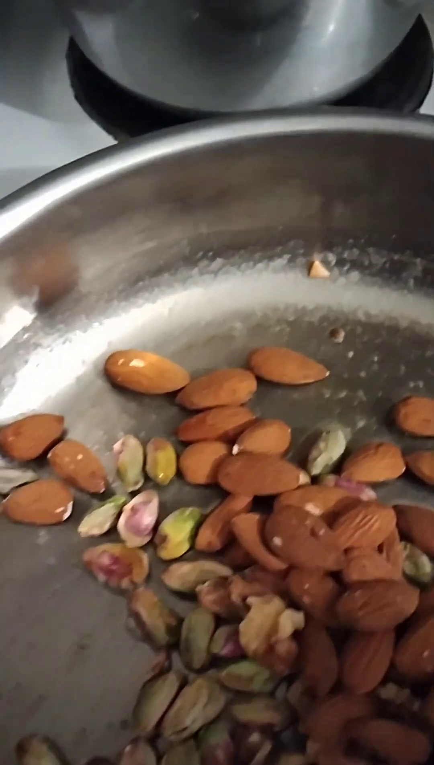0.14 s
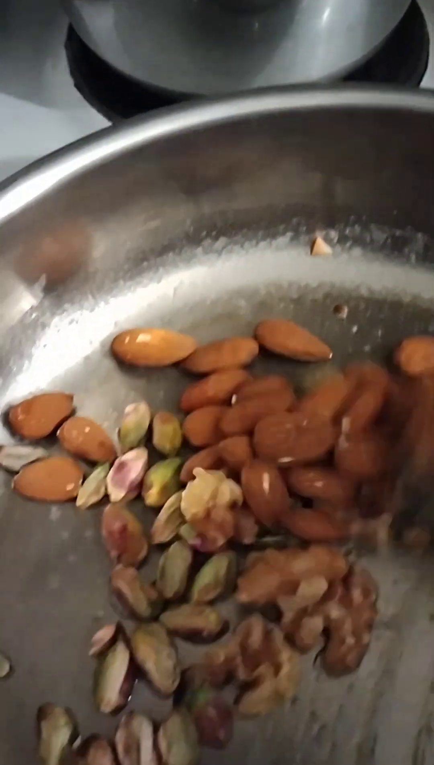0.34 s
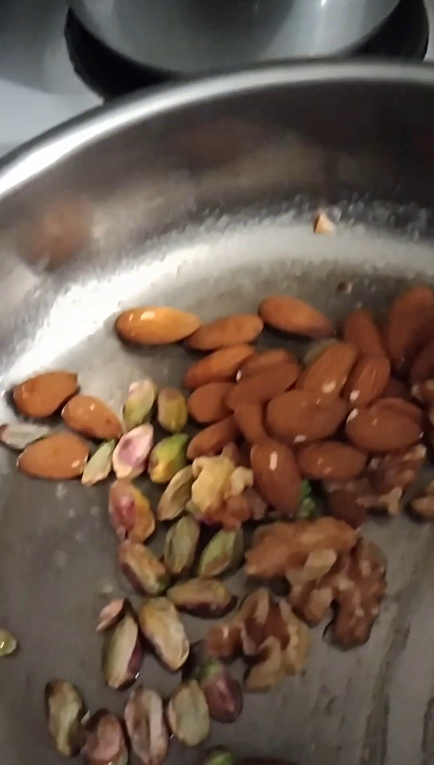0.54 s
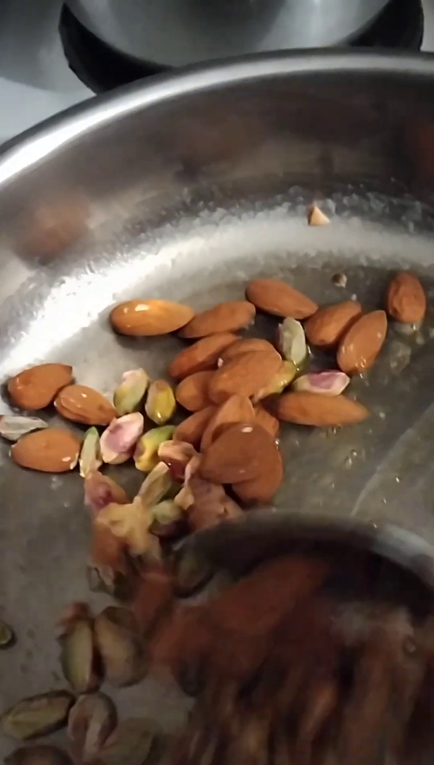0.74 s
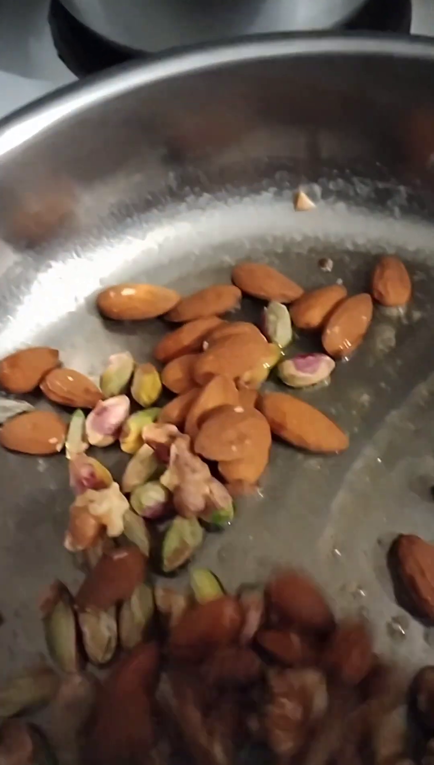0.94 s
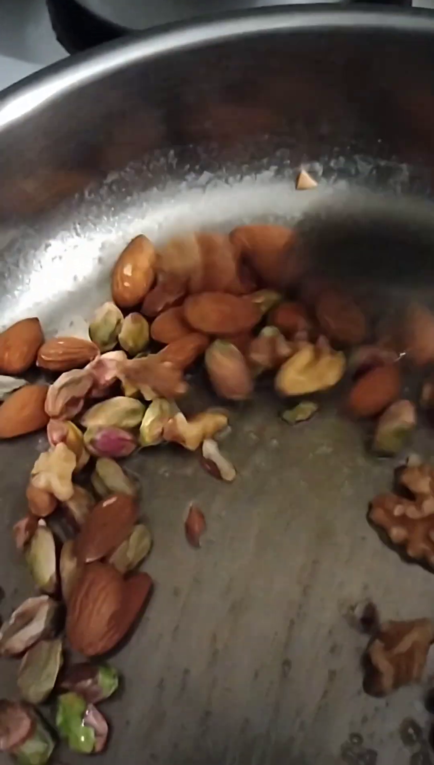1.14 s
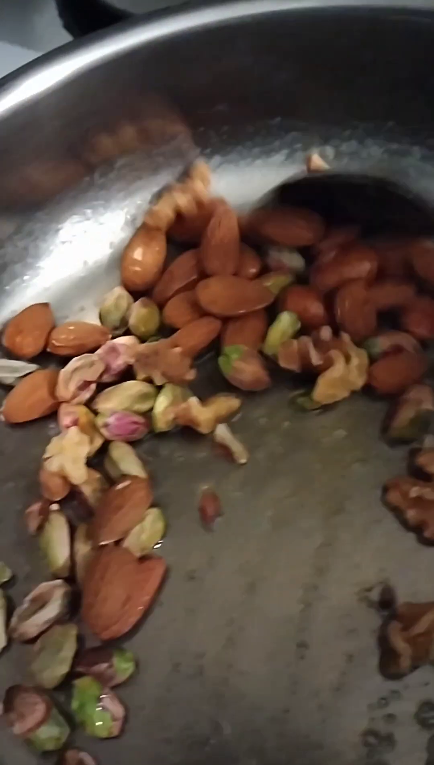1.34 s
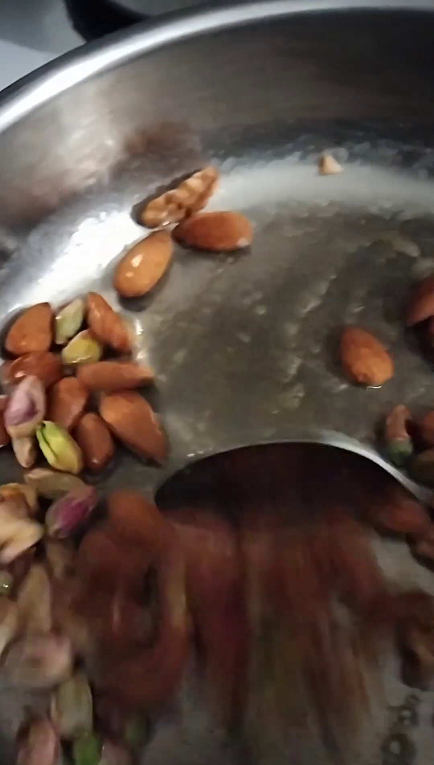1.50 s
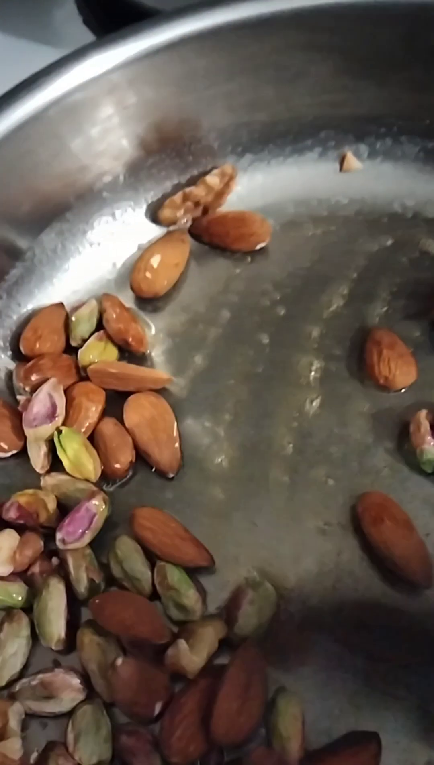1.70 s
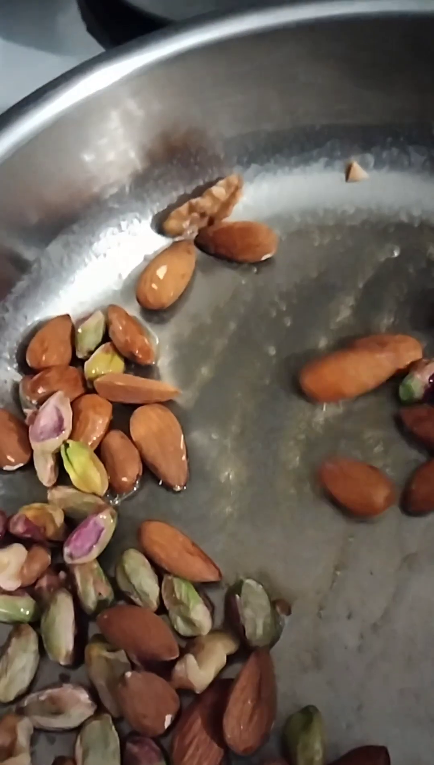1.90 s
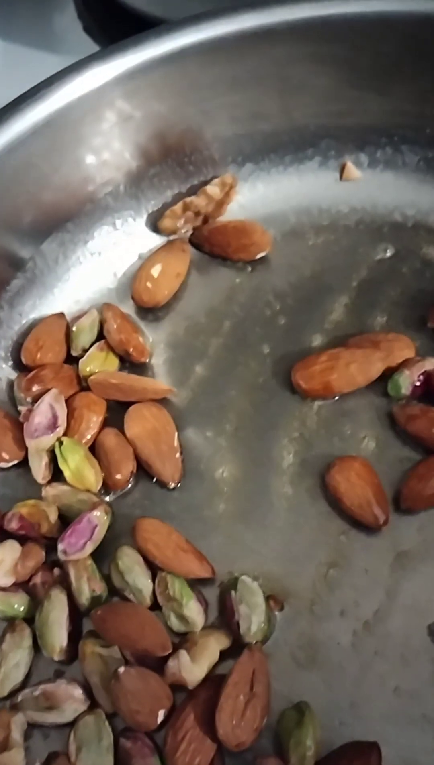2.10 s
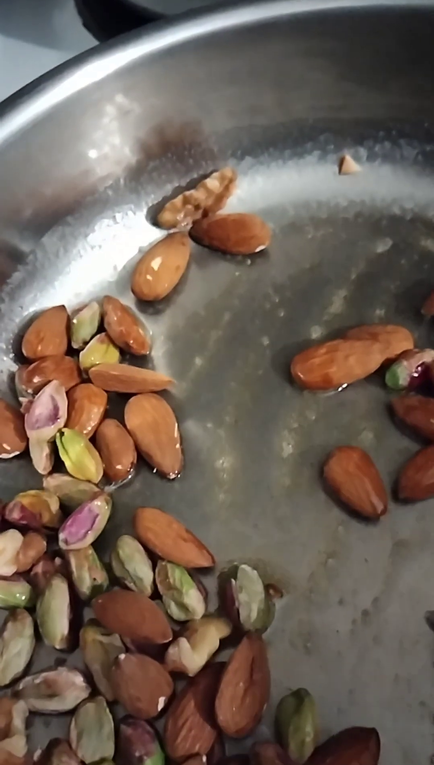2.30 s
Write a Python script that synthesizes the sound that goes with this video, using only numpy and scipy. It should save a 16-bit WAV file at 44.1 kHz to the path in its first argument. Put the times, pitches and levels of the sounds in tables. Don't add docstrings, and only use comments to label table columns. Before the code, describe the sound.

A metal spoon clangs on a steel frying pan, then knocks and scrapes in short strokes while nuts tumble and tap and fat spits; heard very close on a phone in a small kitchen.

```python
import sys
import numpy as np
from scipy import signal
from scipy.fft import rfft, irfft, next_fast_len
from scipy.io import wavfile
from scipy.ndimage import uniform_filter1d, map_coordinates

SR = 44100
rng = np.random.default_rng(int(sys.argv[2]) if len(sys.argv) > 2 else 0)


def pcm_store(signal):
    levels = np.round(np.clip(np.atleast_2d(signal), -1, 1) * 32767)
    wavfile.write(sys.argv[1], SR, levels.astype(np.int16).T)


def ratio_of_db(decibels):
    return 10 ** (np.asarray(decibels, float) / 20)


N = 103635


def unit(x):
    return x / np.sqrt(np.mean(x ** 2) + 1e-20)


def along(points, hz):
    f, v = np.transpose(points)
    return np.interp(np.log(hz + 1), np.log(f + 1), v)


def over_time(rows, outside=None):
    s, value = np.transpose(rows)
    return np.interp(np.arange(N) / SR, s, value, outside, outside)


def wobble(rate):
    knots = rng.standard_normal(int(N * rate / SR) + 4)
    return map_coordinates(knots, [np.arange(N) * rate / SR])


def filtered(x, response):
    m = next_fast_len(N + SR // 2)
    return irfft(rfft(x, m) * response(np.fft.rfftfreq(m, 1 / SR)), m)[..., :N]


def coloured(x, points):
    def response(f):
        inside = (f > points[0][0] / 2) * (f < points[-1][0] * 2)
        return ratio_of_db(along(points, f)) * inside
    return filtered(x, response)


def tilted(points, bright_db):
    return [(hz, g + bright_db * np.log2(hz / 3000)) for hz, g in points]


def resonant(x, peaks):
    def body(f):
        total = 0
        for k, (c, w, db) in enumerate(peaks):
            total = total + (-1) ** k * ratio_of_db(db) * 1j * f * w / (c * c - f * f + 1j * f * w)
        return total
    blow = np.eye(1, N)[0]
    return filtered(x, body) / np.abs(filtered(blow, body)).max()


def bumps(per_s, spread_db):
    u = rng.random((3, N))
    happens = u[0] < per_s / SR
    size = ratio_of_db(-spread_db * np.log(u[2] + .015))
    return unit(happens * np.sign(u[1] - .5) * size)


# start_s, peak_db, chatter_s, spoon_share (0 pan - 1 spoon), bright_db_per_octave
CLANGS = [
    (0.185, -3.5, 0.0028, 0, -2),
    (.204, -5.5, 0.002, 0.2, -2.5),
    (2.04, -2.5, 0.023, 0.69, 1),
]
# pitch_hz, level_db, t60_s
PAN_RING = [(1908, 7, 0.16), (2673, -3, 0.3), (3157, 1.5, 0.24), (5770, -6, 0.29), (6220, 4, 0.1),
            (6600, -9, 0.3)]
# pitch_hz, level_db, t60_s
SPOON_RING = [(1125, -8, .5), (2762, -14, .36), (3451, -16, .3), (4269, -21, .4), (4673, -12, .13),
              (5652, -14, .17), (6772, -8, .14), (9297, -10, .08), (11330, -6, .09), (12370, -9, .09)]
# freq_hz, level_db (per Hz)
CHATTER = [(200, -8.5), (900, -4), (2000, -6), (4500, -9.5), (6400, 4), (8500, -6.5), (13000, -1.5),
           (16000, -11)]
RING_DB, CHATTER_DB, CHATTER_T60_S = -14.5, -10, 0.04


def ringing(modes, s, t, blur):
    out = 0
    for hz, db, t60 in modes:
        phase = 2 * np.pi * hz * (t + s) + blur * wobble(118)[:len(t)]
        out = out + ratio_of_db(db - 60 * t / t60) * np.sin(phase)
    return out


def clangs():
    out, t = np.zeros(N + SR), np.arange(SR // 2) / SR
    for s, db, chatter, spoon_share, bright_db in CLANGS:
        hiss = unit(coloured(bumps(9000, 3.0), tilted(CHATTER, bright_db)))[:len(t)]
        noise = hiss * ratio_of_db(CHATTER_DB - 60 * np.maximum(t - chatter, 0) / CHATTER_T60_S)
        pan = ringing(PAN_RING, s, t, blur=1.4)
        spoon = ringing(SPOON_RING, s, t, blur=.5)
        ring = (1 - spoon_share) * pan + spoon_share * spoon
        swell = 1 - np.exp(-t / 0.0029)
        out[round(s * SR):][:len(t)] += ratio_of_db(db) * (ratio_of_db(RING_DB) * ring * swell + noise)
    return out[:N]


# start_s, click_peak_db, body_db (over the click), steel_db (over the click)
KNOCKS = [(0.204, -15, 4, -20), (0.4457, -22.5, -2, -39), (0.5, -16.5, -7.5, -0.5), (0.5405, -28, -1, -6),
          (0.568, -16.5, -16.5, -32), (0.6384, -3.5, -7.5, -13.5), (0.8136, -19.5, -7, -10),
          (0.88, -19, -10, -8), (0.9823, -25.5, 3, -4), (1.0051, -34.5, 10.5, 24),
          (1.0228, -18.5, -3.5, -10), (1.0282, -10.5, -20, -4), (1.3462, -26.5, -4, 1),
          (1.361, -7.5, -9, -4), (1.5876, -29, 2.5, 22.5), (1.6171, -21, -22, -4), (1.6876, -18, -15, -26),
          (1.732, -29.5, 4, 2), (1.7793, -15.5, -13, -20), (1.8022, -13, -2, -20), (1.8586, -17, -13, -22),
          (2.1886, -32.5, -5, -10), (2.3391, -26.5, -19.5, -20.5)]
# pitch_hz, width_hz, level_db
CLICK = [(3590, 1150, 9.5), (2640, 4400, -3.5), (14000, 2500, -24)]
# pitch_hz, width_hz, level_db
BODY = [(766, 244, 2), (1070, 180, 5), (1417, 560, 1.5), (1975, 58, -6)]
# pitch_hz, width_hz, level_db
STEEL = [(5376, 53, 1), (6500, 160, 5), (7680, 220, -3), (9600, 230, -3), (13300, 630, 6)]
CONTACT_T60_S, RATTLE_DB = 0.019, 3.5
SPOT_DB, DETUNE = 2, .012
SOFT_HZ, HARDER_HZ_PER_DB = 9000, 220


def knocks():
    out, t = np.zeros(N + SR), np.arange(SR // 12) / SR
    for s, db, body_db, steel_db in KNOCKS:
        rattle = ratio_of_db(-60 * t / CONTACT_T60_S) * rng.standard_normal(len(t))
        blow = ratio_of_db(RATTLE_DB) * rattle / np.linalg.norm(rattle)
        blow[0] = 1
        band_hz = SOFT_HZ + HARDER_HZ_PER_DB * np.clip(db, -25, 0)
        blow = 2 * signal.lfilter(*signal.butter(2, band_hz, fs=SR), blow)
        hit = 0
        for part, part_db in ((CLICK, 0), (BODY, body_db), (STEEL, steel_db)):
            for hz, width, g in part:
                b, a = signal.iirpeak(hz * (1 + DETUNE * rng.normal()), hz / width, SR)
                level = ratio_of_db(g - 8.5 + part_db + SPOT_DB * rng.normal())
                hit = hit + level * signal.lfilter(b, a, blow) / (2 * b[0])
        out[round(s * SR):][:len(t)] += ratio_of_db(db) * hit
    return out[:N]


SLIPS_PER_S, SLIP_SPREAD_DB, WANDER_DB = 2500, 3.5, 4
DRIFT, DRIFT_PER_S = .014, 40


def singing(peaks):
    slips, out = bumps(SLIPS_PER_S, SLIP_SPREAD_DB), 0
    for hz, width, db in peaks:
        mode = unit(signal.lfilter(*signal.iirpeak(hz, hz / width, SR), slips))
        slide = np.arange(N) + DRIFT * SR / DRIFT_PER_S / 2 * wobble(DRIFT_PER_S)
        swell = ratio_of_db(db + WANDER_DB * wobble(34.77)) * np.sqrt(width)
        out = out + swell * map_coordinates(mode, [slide])
    return unit(out)


# start_s, pressure_db
STROKES = [
    [(.225, -28), (.289, -28.5), (.321, -22), (.337, -18.5), (.36, -20.5), (.385, -57)],
    [(.648, -29.5), (.7, -22.5), (.758, -19.5), (.768, -27), (.8, -38)],
    [(1.036, -30.5), (1.082, -20), (1.095, -18), (1.112, -14), (1.135, -17.5), (1.142, -34), (1.17, -34)],
    [(1.415, -25.5), (1.447, -23.5), (1.467, -19.5), (1.505, -14.5), (1.555, -18.5), (1.58, -28.5),
     (1.595, -30), (1.61, -42)],
]
# start_s, pressure_db
SKID = [(0.588, -33), (.6, -16), (.615, -48)]
# pitch_hz, width_hz, level_db
SING_1 = [(1060, 34, 2), (3120, 120, -1.5), (5360, 80, -6.5), (7000, 310, -10), (7700, 130, -7.5),
          (9800, 230, -13.5), (13800, 250, -4.5)]
SING_2 = [(1073, 53, -2), (1400, 210, 1.5), (3020, 510, -4.5), (4030, 220, -1.5), (6550, 300, -8),
          (9600, 300, -5.5), (13700, 610, -9)]
SING_3 = [(1061, 20, 1), (3290, 51, -2.5), (4016, 69, 0.5), (6930, 190, -4.5), (9590, 190, -10),
          (13400, 290, -10.5), (14300, 300, -11)]
SING_4 = [(1037, 100, -5), (1755, 170, 0), (2120, 210, -1.5), (3470, 230, -5), (5370, 100, -2),
          (6200, 220, -10.5), (13400, 680, -15.5)]
SING_SKID = [(784, 130, 4), (5390, 170, -20)]
# level_db (over the singing), bright_db_per_octave
GRIT = [
    (-6, 3),
    (1, -1.5),
    (-5, 3),
    (-2.5, -2.5),
    (-2.5, -5),
]
# freq_hz, level_db (per Hz)
DRAG = [(300, -23), (1000, 4.5), (3100, 10), (4900, 5.5), (6700, 10.5), (11500, -6.5), (16000, -29)]
CLUMP_DB, JUDDER_DB = 2.5, 1.6


def scrape():
    out = 0
    sings = (SING_1, SING_2, SING_3, SING_4, SING_SKID)
    for stroke, peaks, (grit_db, bright_db) in zip([*STROKES, SKID], sings, GRIT):
        press = uniform_filter1d(ratio_of_db(over_time(stroke, outside=-120)), size=200)
        grains = bumps(4000, 2.5) * ratio_of_db(CLUMP_DB * wobble(140))
        grit = unit(coloured(grains, tilted(DRAG, bright_db)))
        out = out + press * unit(singing(peaks) + ratio_of_db(grit_db) * grit)
    return out * ratio_of_db(JUDDER_DB * wobble(90) - 1.5)


# start_s, peak_db, pitch_hz
TAPS = [(0.307, -15, 2670), (0.333, -13, 3120), (0.425, -14.5, 810), (0.598, -16, 770), (0.692, -11, 1070),
        (0.717, -8.5, 1490), (0.751, -8.5, 1043), (0.836, -14.5, 1020), (0.872, -11, 1590),
        (0.961, -21.5, 1060), (1.064, -16, 4030), (1.15, -12.5, 1060), (1.197, -17, 660),
        (1.233, -16.5, 1020), (1.278, -21, 745), (1.299, -17.5, 810), (1.332, -21, 980), (1.423, -8, 3130),
        (1.464, -5.5, 2130), (1.503, -10, 5370), (1.664, -15.5, 2070), (1.752, -21, 1890),
        (1.881, -19.5, 1040), (1.94, -24, 1050), (1.995, -29, 735), (2.011, -33, 650), (2.265, -29.5, 1410)]
TAP_CYCLES, TAP_T60_S = 13.4, 0.03


def taps():
    out, t = np.zeros(N + SR), np.arange(SR // 30) / SR
    for s, db, hz in TAPS:
        blow = ratio_of_db(-60 * t / TAP_T60_S) * rng.standard_normal(len(t)) / 2
        blow[0] = 2
        soft_blow = uniform_filter1d(blow, size=3, origin=1, mode="constant")
        tap = signal.lfilter(*signal.iirpeak(hz, TAP_CYCLES, SR), soft_blow)
        out[round(s * SR):][:len(t)] += ratio_of_db(db - 6.5) * tap / np.abs(tap).max()
    return out[:N]


# start_s, level_db
TUMBLE = [(0, -84), (.18, -55), (.22, -37), (.45, -30), (.75, -38), (.9, -32.5), (.95, -45), (1.0, -27.5),
          (1.25, -34), (1.7, -30.5), (1.95, -37), (2.25, -48.5)]
# freq_hz, level_db (per Hz)
NUT = [(300, -15), (650, -1.5), (1040, -6.5), (3500, -8), (7000, -12.5), (14000, -43)]
# freq_hz, level_db (per Hz)
RUMBLE = [(25, -42), (60, 6), (130, 14), (350, 1)]
NUT_BUMPS_PER_S, NUT_SPREAD_DB, NUT_BODY_DB, RUMBLE_DB = 900, 3.8, -3, -18


def nuts():
    motion = ratio_of_db(over_time(TUMBLE))
    hits = bumps(NUT_BUMPS_PER_S, NUT_SPREAD_DB) * ratio_of_db(2.6 * wobble(45))
    tumble = unit(coloured(hits, NUT)) + ratio_of_db(NUT_BODY_DB) * unit(resonant(hits, BODY))
    rock = ratio_of_db(RUMBLE_DB + 3.5 * wobble(9.3)) * unit(coloured(rng.standard_normal(N), RUMBLE))
    return motion * (tumble / 2.53 + rock)


# start_s, peak_db, pitch_hz
SPITS = [(0.0303, -24, 12900), (0.0537, -20.5, 8270), (0.1171, -28.5, 13100), (0.139, -27, 14300),
         (0.816, -21, 8240), (0.8405, -23, 14300), (0.9101, -20, 9400), (0.9327, -26.5, 7700),
         (0.9577, -24, 11600), (1.0093, -6, 7900), (1.1464, -19, 9030), (1.2301, -23, 9450),
         (1.277, -23, 7260), (1.31, -26, 14000), (1.3923, -7, 13200), (1.4491, -28, 13000),
         (1.5859, -4, 8270), (1.6342, -9.5, 12100), (1.656, -12.5, 13000), (1.715, -20, 7570),
         (1.7642, -11.5, 9000), (1.84, -22, 14300), (1.8695, -8.5, 12200), (1.8961, -19, 12200),
         (1.9659, -23, 8000), (1.9861, -11.5, 7900), (2.013, -20, 11300), (2.1449, -18, 9100),
         (2.2094, -28, 8600), (2.2393, -23, 12400), (2.266, -35, 8730), (2.2834, -27, 9290),
         (2.3154, -25, 9040)]
# start_s, level_db
SIZZLE = [(0, -29), (.18, -25), (.4, 11.5), (1.8, 28.5), (2.35, 18.5)]
SPIT_CYCLES, SIZZLE_PER_S, SIZZLE_DB, SIZZLE_HZ, SIZZLE_SPREAD_DB = 9, 180, -53, 12000, 2.8


def fat():
    u = rng.random((round(SIZZLE_PER_S * N / SR), 3))
    small_s = u[:, 0] * N / SR
    stirred_db = np.interp(small_s, *np.transpose(SIZZLE))
    small_db = SIZZLE_DB + stirred_db - SIZZLE_SPREAD_DB * np.log(u[:, 1] + 0.053)
    small_hz = SIZZLE_HZ * np.exp(0.72 * (u[:, 2] - .6))
    droplets = np.r_[np.array(SPITS), np.c_[small_s, small_db, small_hz]]
    s, db, hz = droplets.T[:, :, None]
    cycles = np.arange(128) / SR * hz
    life = cycles * 8.7 / SPIT_CYCLES
    drops = 2.38 * ratio_of_db(db) * life * np.exp(-life) * np.sin(2 * np.pi * cycles)
    places = np.round(s * SR).astype(int) + np.arange(128)
    return np.bincount(places.ravel(), drops.ravel(), N + SR)[:N]


# start_s, peak_db, pitch_hz, t60_s
JOLTS = [(.202, -19.5, 425, 0.063), (0.201, -41, 58.5, .15), (.228, -28, 109, 0.13),
         (0.638, -21, 49, 0.094), (.982, -22, 173, .06), (0.985, -20, 443, 0.065), (1.007, -26, 218, 0.035),
         (1.027, -19.5, 435, 0.04), (1.027, -29, 169, 0.043), (1.066, -30, 129, .06),
         (1.36, -36, 58.4, 0.13), (1.731, -23.5, 318, 0.039), (1.751, -30, 194, 0.059),
         (1.802, -28.5, 120, 0.13), (1.9, -34.5, 105, 0.26), (2.047, -32, 60.4, 0.072),
         (2.081, -29, 101.7, 0.21)]


def jolts():
    out, t = np.zeros(N), np.arange(N) / SR
    for s, db, hz, t60 in JOLTS:
        fade = ratio_of_db(db - 60 * np.maximum(t - s, 0) / t60)
        out += fade * (t > s) * np.sin(2 * np.pi * hz * (t - s))
    return out


# freq_hz, t60_s
KITCHEN = [(200, 0.29), (2000, 0.25), (12000, 0.13)]


def kitchen(x):
    hz, t, z = signal.stft(rng.standard_normal(SR // 2), SR, nperseg=256)
    decay = ratio_of_db(-60 * t / along(KITCHEN, hz)[:, None])
    tail = signal.istft(z * decay, SR, nperseg=256)[1]
    return signal.fftconvolve(np.pad(x, (120, 0)), tail / np.linalg.norm(tail))[:N]


# freq_hz, level_db (per Hz)
ROOM = [(25, 13), (400, -2.5), (1000, -9), (2600, -21), (8400, -8), (16000, -7)]


def room():
    return unit(coloured(rng.standard_normal(N), ROOM))


KITCHEN_DB, ROOM_DB = -8.5, -53.5


def scene():
    pan = clangs() + knocks() + scrape() + taps() + nuts() + fat() + jolts()
    mix = pan + ratio_of_db(KITCHEN_DB) * kitchen(pan) + ratio_of_db(ROOM_DB) * room()
    return mix[None]


def top_cut(x):
    return signal.sosfilt(signal.butter(12, 16810, fs=SR, output="sos"), x)


def record(dry):
    TOP_HZ = 15850
    clipped = dry / (1 + np.abs(dry) ** 6) ** (1 / 6)
    mix = filtered(clipped, lambda f: np.where(f < TOP_HZ, 1, ratio_of_db(-38)))
    return top_cut(mix)


dry = scene()
out = record(dry)
pcm_store(out)
```